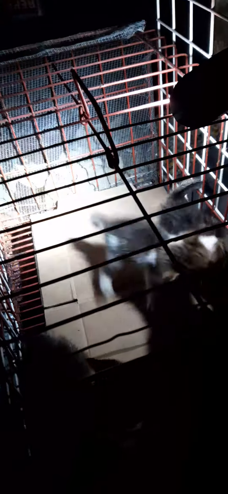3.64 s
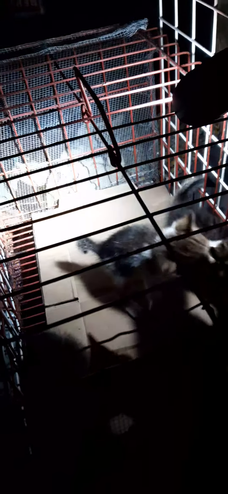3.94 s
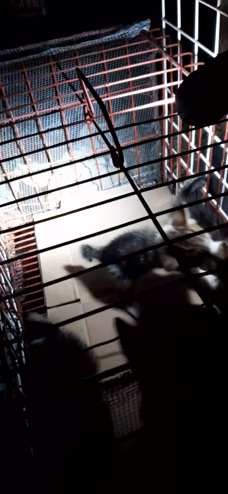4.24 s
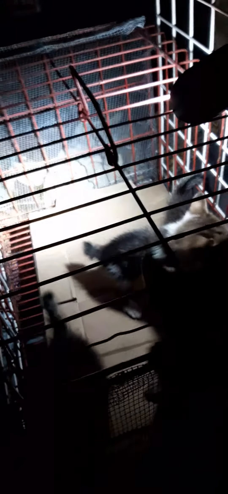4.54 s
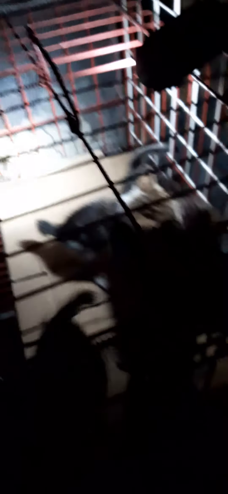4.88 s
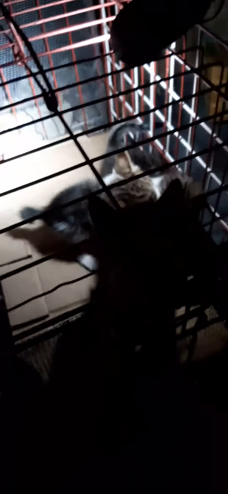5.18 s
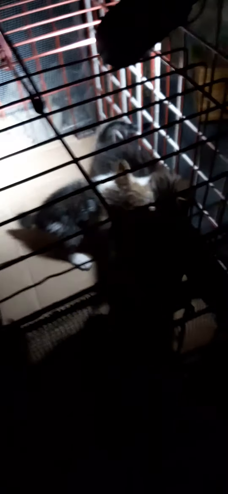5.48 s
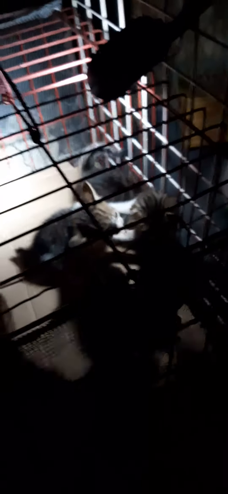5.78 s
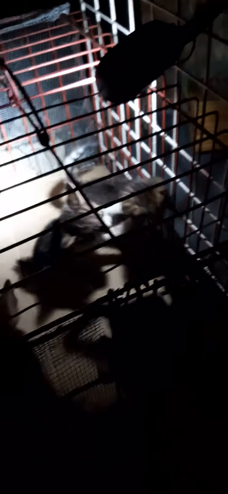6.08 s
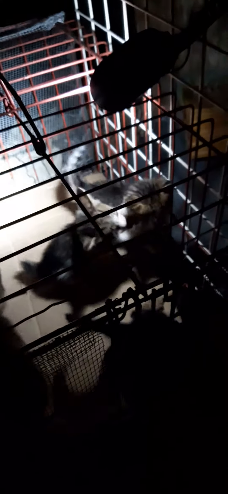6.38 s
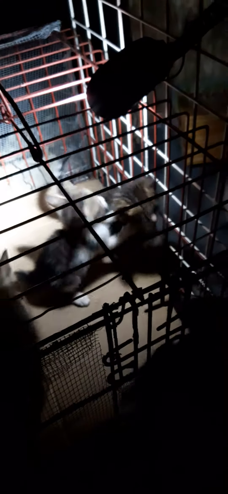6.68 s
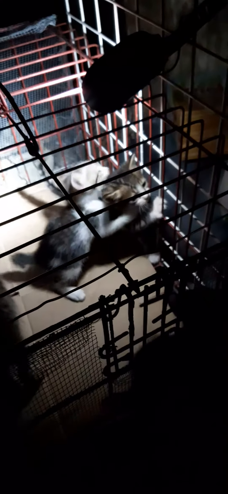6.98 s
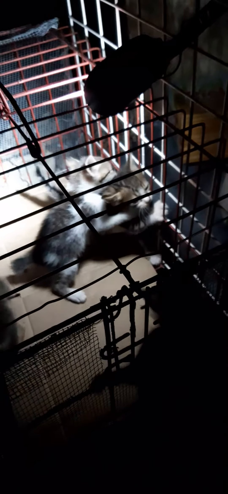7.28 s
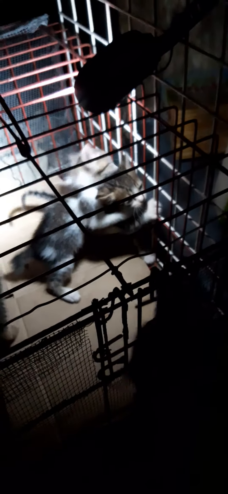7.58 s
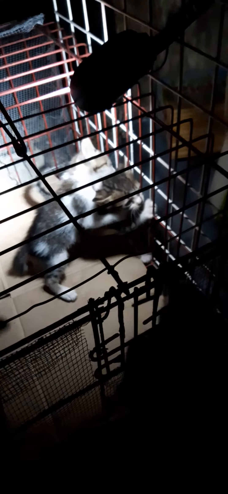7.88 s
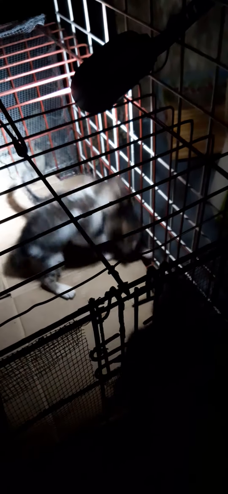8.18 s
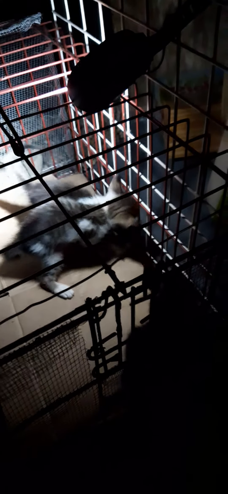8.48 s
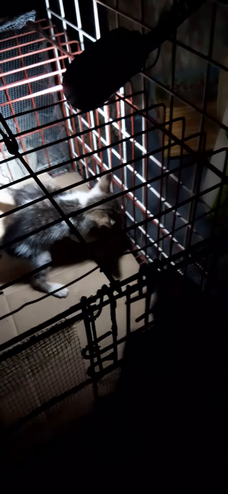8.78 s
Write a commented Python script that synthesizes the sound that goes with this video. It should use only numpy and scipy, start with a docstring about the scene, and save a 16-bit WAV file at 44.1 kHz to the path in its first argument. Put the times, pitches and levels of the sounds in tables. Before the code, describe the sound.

Kittens clamber in a wire cage indoors, over low room noise. Paws knock on the plastic tray, claws tick on the wire and fur scuffs the floor. After a second, a rooster outside gives one long, hoarse crow, followed by the loudest knock and a faint whistle. The knocks go on, a thin, high hiss comes twice, and a small animal peeps faintly near the end. The microphone is just above the cage.

```python
"""Kittens clamber in a wire cage indoors at night, over low room noise. From the start, paws and bars
knock on the plastic tray and make it ring, claws tick on the wire, and fur and feet scuff the floor.
After a second, a rooster outside gives one long, hoarse crow. The loudest knock and a faint, clean
whistle follow. Later a thin, high hiss comes twice, fur brushes past the bars, and near the end a
small animal peeps faintly. A phone held just above the cage hears it all."""
import sys
import numpy as np
from scipy import signal
from scipy.fft import rfft, irfft, next_fast_len
from scipy.io import wavfile
from scipy.ndimage import uniform_filter1d

SR = 44100
rng = np.random.default_rng(int(sys.argv[2]) if len(sys.argv) > 2 else 0)


def unload_wav(signal):
    """Save mono or channel-first audio to the path in sys.argv[1] as 16-bit WAV at rate SR, clipped to [-1, 1]."""
    wavfile.write(
        sys.argv[1],
        SR,
        np.round(np.clip(np.atleast_2d(signal).T, -1, 1) * 32767).astype(np.int16),
    )


N = 424241
TIME = np.arange(N) / SR
TOP_HZ = 16000  # the phone's upper limit


def undb(db):
    """Turn decibels into a number to multiply by."""
    return 10 ** (np.asarray(db) / 20)


def unit(x):
    """Scale a signal so that its average power is 1."""
    return x / np.sqrt(np.mean(x ** 2))


def pan(db):
    """Two gains that make the left side this many dB louder than the right."""
    return undb(np.array([[db], [-db]]) / 2)


def gain_at(hz, tone):
    """Read the gain at a frequency from a tone table, whose rows are Hz and dB."""
    table_hz, db = np.transpose(tone)
    return undb(np.interp(np.log(hz + 1), np.log(table_hz), db))


def colour(x, tone):
    """Filter a sound by a tone table, falling away steeply beyond the table's ends."""
    size = next_fast_len(x.shape[-1])
    hz = np.fft.rfftfreq(size, 1 / SR)
    low_cut = np.minimum(hz / tone[0][0], 1) ** 4
    high_cut = np.minimum(tone[-1][0] / (hz + 1), 1) ** 2
    return irfft(rfft(x, size) * gain_at(hz, tone) * low_cut * high_cut, size)[..., :x.shape[-1]]


def noise(tone, size, side_db):
    """Stereo noise with a given tone; a higher side_db makes it wider."""
    mid, side = colour(rng.standard_normal((2, size)), tone)
    return unit(mid) + undb(side_db) * unit(side) * np.array([[1], [-1]])


def varied(tone, spread_db):
    """Add chance peaks and dips to a tone: every spot of the cage sounds a little different."""
    hz = np.geomspace(tone[0][0], tone[-1][0], 24)
    db = 20 * np.log10(gain_at(hz, tone)) + spread_db * rng.standard_normal(len(hz))
    return list(zip(hz, db))


def wobble(per_second):
    """Smooth random motion, about 1 in size."""
    hold = max(int(SR / per_second), 2)
    steps = np.repeat(rng.standard_normal(N // hold + 1), hold)
    return unit(uniform_filter1d(steps, hold)[:N])


def fade(t, t60):
    """Die away by 60 dB every t60 seconds."""
    return np.exp(-np.log(1000) * t / t60)


def swell(t, middle, length):
    """A bell-shaped rise and fall."""
    return np.exp(-2 * np.minimum(((t - middle) / length) ** 2, 20))


def add(out, start, sound):
    """Mix a sound in at a start time in seconds."""
    i = max(int(start * SR), 0)
    out[:, i:i + sound.shape[1]] += sound[:, :N - i]


def reverb(x, t60, wet_db):
    """The direct sound plus a wash of echoes, different on each side."""
    t = np.arange(SR) / SR
    tail = rng.standard_normal((2, SR)) * fade(t, t60) * (t > .005)
    tail /= np.sqrt(np.sum(tail ** 2, axis=1, keepdims=True))
    return x + undb(wet_db) * signal.fftconvolve(np.atleast_2d(x), tail, axes=1)[:, :N]


# The tone of the room's air and of its rumble. Each row: frequency in Hz, relative level in dB.
AIR_TONE = [(28, -40), (48, -0.5), (80, -4), (263, -0.5), (290, -10), (344, -1), (379, -6.5), (887, -10.5),
            (2290, -24), (2990, -33.5), (10100, -39), (12500, -38), (16000, -45)]
RUMBLE_TONE = [(50, -4), (90, -10), (160, 0), (260, -1.5), (450, -9.5)]
# How wide the air sounds. Each row: frequency in Hz, level of the side signal against the middle in dB.
AIR_WIDTH = [(50, -15.5), (250, -13), (800, 0), (2000, 1), (5000, 0.5)]
# Level of the low room noise: it ducks at the loudest knock, then slowly recovers.
# Each row: time in seconds, level in dB.
RUMBLE_LEVELS = [(0, -67), (.7, -52.5), (2.7, -61), (2.9, -86), (9.6, -71)]
# The notes of the hum. Each row: frequency in Hz, level in dB.
HUM_NOTES = [(55, -66), (103, -67.5), (209, -64.5)]


def room():
    """Low room noise, alike on both sides in the bass, with a faint wavering hum."""
    mid, side = colour(rng.standard_normal((2, N)), AIR_TONE)
    side = colour(side, AIR_WIDTH + [(TOP_HZ, 0)])
    air = (mid + side * np.array([[1], [-1]])) / np.std(mid)
    air *= undb(-52.2 + .7 * wobble(5))
    rumble_db = np.interp(TIME, *np.transpose(RUMBLE_LEVELS))
    rumble = undb(rumble_db) * noise(RUMBLE_TONE, N, side_db=-14)
    hum = 0
    for hz, db in HUM_NOTES:
        level = undb(db + 4.6 * wobble(11))
        hum += level * np.sin(2 * np.pi * np.cumsum(hz + 3 * wobble(8.3)) / SR)
    return (air + rumble + hum) * pan(-1.64)


# Two thin hisses. Each row: middle in seconds, length in seconds, frequency in Hz, relative level in dB.
HISSES = [(6.983, 0.38, 12800, -69), (7.954, 0.29, 12600, -68)]


def high_hiss():
    """A narrow band of very high hiss swells and fades."""
    out = 0
    for middle, length, hz, db in HISSES:
        band = [(hz * .8, -45), (hz * .92, -8), (hz, 0), (hz * 1.06, -8), (hz * 1.2, -45)]
        out += undb(db - 1) * swell(TIME, middle, length) * noise(band, N, side_db=-2)
    return out * pan(-5)


# One whistle, then the peeps. Each row: start in seconds, length in seconds, pitch in Hz, level in dB,
# waver as a share of the pitch.
FAINT_CALLS = [(2.883, 0.22, 1626, -59, 0.0022), (8.71, 0.092, 2750, -66, .08),
               (8.957, 0.067, 2463, -51, 0.019), (9.011, 0.078, 2620, -62, 0.051),
               (9.126, 0.056, 2410, -61, .024), (9.207, 0.087, 2386, -57.5, 0.047),
               (9.48, 0.066, 2436, -57, .018)]


def faint_calls():
    """A faint, clean whistle after the crow, then a small animal's unsteady peeps near the end."""
    out, waver = np.zeros((2, N)), wobble(400)
    for start, length, pitch, db, unsteady in FAINT_CALLS:
        progress = np.linspace(0, 1, int(length * SR))
        hz = pitch * (1 + unsteady * waver[int(start * SR):][:len(progress)])
        arch = 2 * np.sqrt(progress * (1 - progress))
        add(out, start, undb(db) * arch[None] * np.sin(2 * np.pi * np.cumsum(hz) / SR))
    return reverb(out, t60=.3, wet_db=-4)


def crow_voice(syllables, throat, jitter, rough_db, rasp_db):
    """Each syllable slides up, swells and fades; the throat shapes its raspy overtones."""
    scoop_share, scoop_s = .0499, .0352  # the pitch starts a little flat
    hold_s, sag_hz_per_s = .21, 500  # and sags when it is held for long
    rise_db, fade_db = 12, 11.5  # how far below its peak a syllable starts and ends
    dulling = .15  # overtones fade first: extra dB lost per octave for each dB of effort lost
    out = np.zeros(N)
    waver = 1 + jitter * wobble(130) + .007 * wobble(22)
    flutter = undb(rough_db * wobble(70))
    harmonic = np.arange(1, 11)[:, None]
    hoarse = undb(rasp_db) * harmonic  # higher overtones rasp more
    for start, length, rise, pitch, db in syllables:
        on = (TIME > start) & (TIME < start + length)
        t = TIME[on] - start
        scoop = 1 - scoop_share * np.exp(-t / scoop_s)
        sag_hz = sag_hz_per_s * np.maximum(t - hold_s, 0)
        hz = (pitch * scoop - sag_hz) * waver[on]
        phase = harmonic * 2 * np.pi * np.cumsum(hz) / SR
        rasp = unit(uniform_filter1d(rng.standard_normal(phase.shape), size=130))
        partials = (np.sin(phase) + hoarse * rasp * np.cos(phase)) / np.sqrt(1 + hoarse ** 2)
        rising, falling = t / rise, (t - rise) / (length - rise)
        effort_db = -np.where(t < rise, rise_db * (1 - rising), fade_db * falling ** 2)
        brightness = undb(dulling * effort_db * np.log2(harmonic))
        voice = np.sum(gain_at(harmonic * hz, throat) * brightness * partials, axis=0)
        edges = np.clip(np.minimum(t, length - t) / .02, 0, 1)
        out[on] += np.sqrt(2) * voice * edges * flutter[on] * undb(db + effort_db)
    return out


# The syllables of the rooster's higher and lower voice. Each row: start in seconds, length in seconds,
# rise time in seconds, pitch in Hz, relative level in dB.
HIGH_SYLLABLES = [(1.02, 0.24, 0.035, 628, -52), (1.275, .19, 0.075, 945, -44.5),
                  (1.615, 0.26, 0.071, 918.3, -43)]
LOW_SYLLABLES = [(1.03, 0.21, 0.019, 790, -51.5), (1.255, 0.23, 0.021, 793, -45.5),
                 (1.485, 0.26, 0.11, 788, -32.5), (1.755, .15, 0.019, 787, -40),
                 (1.955, .5, 0.068, 744.2, -36)]
# How the throat shapes each voice. Each row: frequency in Hz, boost or cut in dB.
HIGH_THROAT = [(600, -6), (920, 2), (1250, -0.5), (1850, 2), (2750, -13), (3200, -13.5), (3750, -10.5),
               (4600, -47), (6600, -27), (8000, -48), (10000, -59)]
LOW_THROAT = [(600, -2.5), (800, -1), (1350, -18), (1600, -19), (1850, -16), (1980, -7.5), (2100, -15),
              (2240, -34), (2480, -21), (3100, -34.5), (3700, -28), (5000, -62)]


def rooster():
    """The crow splits into two voices that sound at once; it comes in by way of the yard walls."""
    high = crow_voice(HIGH_SYLLABLES, HIGH_THROAT, jitter=.005, rough_db=1.8, rasp_db=-13.5)
    low = crow_voice(LOW_SYLLABLES, LOW_THROAT, jitter=.007, rough_db=2.1, rasp_db=-8.5)
    return reverb(high + low, t60=.4, wet_db=-3.5) * pan(1.8)


# The bright tone of claws and rubbing, and the duller tone of a drag at the middle of the tray.
# Each row: frequency in Hz, relative level in dB.
CLAW_TONE = [(1470, 7), (2500, -0.5), (3440, -4), (4310, -3.5), (5350, -2.5), (7250, -4), (11100, -3),
             (16000, -5)]
DRAG_TONE = [(120, -16), (350, -3), (600, -1), (820, 11), (1150, -12.5), (1900, -21.5), (4000, -34.5)]
DRAG_PEAK_HZ = 820


def slide(t, hiss_db, drag_db, peak_hz=DRAG_PEAK_HZ):
    """Rubbing makes the surface hiss and the tray sound a lower band of noise around peak_hz."""
    drag_tone = [(hz * peak_hz / DRAG_PEAK_HZ, db) for hz, db in DRAG_TONE]
    hiss = undb(hiss_db) * noise(varied(CLAW_TONE, spread_db=2), len(t), side_db=1.5)
    drag = undb(drag_db) * noise(varied(drag_tone, spread_db=4), len(t), side_db=-5)
    return hiss * pan(-5) + drag * pan(.98)


def swish():
    """Fur brushes past the bars once, smoothly, without catching."""
    brush = slide(TIME, hiss_db=-58.5, drag_db=-47.5, peak_hz=1360)
    return swell(TIME, middle=8.485, length=.078) * brush


# Paws and fur sliding. Each row: middle in seconds, length in seconds, hiss in dB, drag in dB.
SCUFFS = [(0.014, 0.085, -55.5, -46.5), (0.508, 0.096, -64, -54.5), (0.702, 0.039, -65.5, -46.5),
          (0.753, 0.044, -55.5, -45), (0.829, 0.15, -65, -52), (1.622, .06, -58, -44.5),
          (1.732, 0.032, -53, -50), (1.791, .12, -63, -46.5), (1.972, 0.049, -44.5, -42.5),
          (2.07, 0.14, -53.5, -46.5), (2.228, 0.05, -41.5, -45), (2.408, 0.07, -47, -48),
          (2.685, 0.18, -62.5, -51.5), (2.712, 0.025, -46.5, -55), (3.334, 0.073, -74.5, -53.5),
          (3.513, 0.061, -55.5, -67), (3.695, 0.092, -62.5, -54.5), (4.688, 0.088, -67.5, -55),
          (5.852, 0.04, -61.5, -45), (5.934, .05, -58, -48), (5.99, .08, -58.5, -41.5),
          (6.073, 0.11, -64, -54), (6.641, 0.094, -59, -54), (6.91, 0.052, -57, -61),
          (7.49, 0.076, -72, -54), (7.667, 0.069, -64, -59), (8.979, 0.023, -63, -61),
          (9.279, 0.039, -64, -60)]


def scuffs():
    """Sliding is a train of tiny catches that hiss on the surface and rumble in the tray."""
    # a faint rustle, as the kittens are never quite still
    out = undb(-79 + 1.5 * wobble(9)) * noise(CLAW_TONE, N, side_db=0) * pan(-7)
    for middle, length, hiss_db, drag_db in SCUFFS:
        t = np.arange(max(middle - 1.5 * length, 0), middle + 1.5 * length, 1 / SR)
        add(out, t[0], swell(t, middle, length) * slide(t, hiss_db, drag_db))
    catches = undb(2 * wobble(160) + 3.5 * wobble(2000))
    return out * unit(catches)


def burst(tone, t, t60, tail_db, tail_t60, side_db):
    """A quick crack followed by a weaker rattle of the bars."""
    attack = 1 - np.exp(-t / .00096)
    decay = fade(t, t60) + undb(tail_db) * fade(t, tail_t60)
    return attack * decay * noise(varied(tone, spread_db=1.5), len(t), side_db)


# Claws on the wire. Each row: start in seconds, relative level in dB.
CLAW_TICKS = [(0.338, -40), (0.7533, -30.5), (1.707, -36), (1.944, -37), (2.0637, -40), (2.226, -33),
              (2.364, -44), (2.558, -40.5), (3.4475, -36.5), (4.265, -42), (5.0456, -41), (5.8218, -36.5),
              (6.3697, -40.5), (6.589, -35.5), (6.6358, -33), (7.6183, -39.5), (7.686, -39)]


def ticks():
    """Claws catch the wire: bright, dry clicks, with faint ones at random in between."""
    out, t = np.zeros((2, N)), np.arange(SR // 4) / SR
    faint = [(rng.uniform(0, N / SR), rng.uniform(-59.5, -53.5)) for _ in range(10)]
    for start, db in CLAW_TICKS + faint:
        click = burst(CLAW_TONE, t, t60=.06, tail_db=-11, tail_t60=.093, side_db=-.5)
        add(out, start, undb(db - 12) * click)
    return out * pan(-4)


# The notes the plastic tray rings at. Each row: frequency in Hz, relative level in dB,
# seconds to fade by 60 dB.
TRAY_NOTES = [(345, -25, .08), (549, -25, .05), (730, 0, .05), (797, -4, .04), (877, -10, .05),
              (1050, -29, .075), (1135, -20, .07), (1230, -21, .06), (1405, -37, .06), (1717, -43, .07)]


def tray_ring(t, blow_db, hardness):
    """Hard blows bring out the tray's weaker notes; light ones land anywhere, so their ring varies."""
    hz, note_db, t60 = np.transpose(TRAY_NOTES)[:, :, None]
    lightness = np.clip((-10.5 - blow_db) / 20, 0, 1)
    level_shift, pitch_shift = lightness * rng.standard_normal((2, len(TRAY_NOTES), 1))
    level = undb(note_db * (1 - .5 * hardness) + 4.4 * level_shift)
    notes = np.sin(2 * np.pi * hz * (1 + .05 * pitch_shift) * t)
    ring = np.sum(level * fade(t, t60 * (1 - .45 * lightness)) * notes, axis=0)
    ring *= 1 - np.exp(-(t / .00097) ** 2)  # a soft contact takes a moment to push
    return undb(blow_db - 1.16) * ring / np.abs(ring).max()


# The tone of a blow's sharp clack and of its low thump. Each row: frequency in Hz, relative level in dB.
CLACK_TONE = [(600, -16), (1250, 1.5), (2000, -2), (3000, -21), (5000, -38)]
THUMP_TONE = [(90, -44), (190, -10.5), (300, -1), (450, -5.5), (700, -8.5)]
# Blows on the tray. Each row: start in seconds, relative level in dB, hardness from 0 to 1,
# then the relative levels of the claw tick and of the thump in dB.
TRAY_BLOWS = [(0.045, -31.5, 0.86, -57, -46), (0.329, -29.5, 1, -47.5, -48), (0.683, -31, .2, -48.5, -42),
              (0.805, -29.5, 1, -44.5, -50), (0.826, -26.5, 0.92, -64, -55), (0.877, -31, 1, -63, -63),
              (1.124, -26.5, .9, -53, -43.5), (2.019, -20.5, 0.9, -56, -65), (2.6, -29, .5, -63, -55),
              (2.714, -26.5, 0.9, -42, -42), (2.801, -1, .1, -38, -30), (2.83, -31, 1, -55, -42),
              (3.288, -35.5, 0, -72, -57), (3.326, -28.5, 0.47, -58, -42), (3.366, -36.5, .1, -65, -62),
              (3.602, -17.5, 0.48, -46, -38.5), (3.64, -36, 1, -55, -36), (3.679, -27.5, .7, -49.5, -36.5),
              (4.742, -30.5, .6, -51, -55), (4.927, -39, .7, -55, -52), (4.95, -36.5, 1, -58, -44.5),
              (5.507, -35, 0.95, -70, -46), (5.838, -25.5, .1, -50, -45), (5.917, -33.5, 0.6, -50, -41),
              (5.964, -6.5, 0.73, -32.5, -31.5), (6.043, -32, .6, -69, -44), (6.621, -36, 0.8, -72, -48),
              (7.504, -39.5, 1, -56.5, -45.5), (8.062, -41, 1, -60, -57), (8.163, -37, 1, -61.5, -51)]


def knocks():
    """Paws and bars hit the tray with a ring, clack, thump and tick; light steps fall at random."""
    out, t = np.zeros((2, N)), np.arange(SR // 4) / SR
    steps = [(rng.uniform(0, N / SR), -44, rng.random(), -66, -58) for _ in range(9)]
    for start, db, hardness, tick_db, thump_db in TRAY_BLOWS + steps:
        ring = tray_ring(t, db, hardness)
        clack = burst(CLACK_TONE, t, t60=.033, tail_db=-21, tail_t60=.08, side_db=2.5)
        clack *= undb(db - 26.5 + 10.5 * hardness)  # harder contacts clack louder
        thump = burst(THUMP_TONE, t, t60=.076, tail_db=-16, tail_t60=.34, side_db=-25)
        thump *= undb(thump_db + 2.5)
        tick = burst(CLAW_TONE, t, t60=.018, tail_db=-9.5, tail_t60=.095, side_db=.5)
        tick *= undb(tick_db + 1.5)
        add(out, start, (ring + thump) * pan(3) + clack * pan(.36) + tick * pan(-4.5))
        add(out, start - .003, hardness * undb(-5) * clack)  # the paw grazes just before it lands
    return reverb(out, t60=.18, wet_db=-17)


def scene():
    """Mix the cage close by, the calls further off, the high hiss and the room."""
    return knocks() + ticks() + scuffs() + swish() + rooster() + faint_calls() + high_hiss() + room()


def record(dry):
    """The phone cuts the deepest bass and the highest treble."""
    bass_cut = signal.butter(10, 47, "high", fs=SR, output="sos")
    treble_cut = signal.ellip(10, .1, 80, TOP_HZ, fs=SR, output="sos")
    return signal.sosfilt(treble_cut, signal.sosfilt(bass_cut, dry))


dry = scene()
out = record(dry)
unload_wav(out)
```